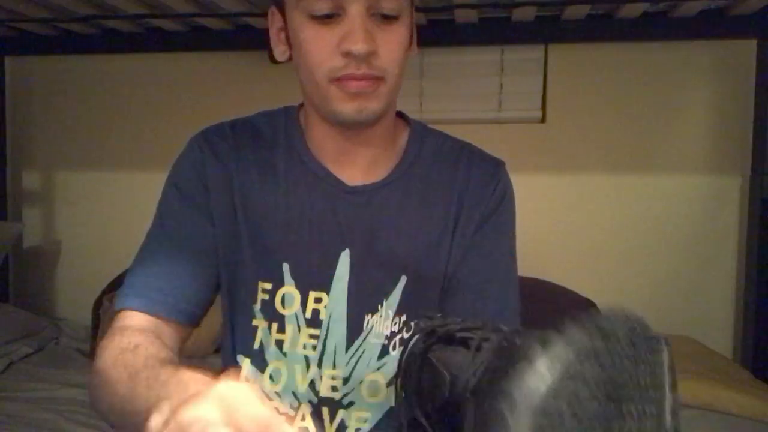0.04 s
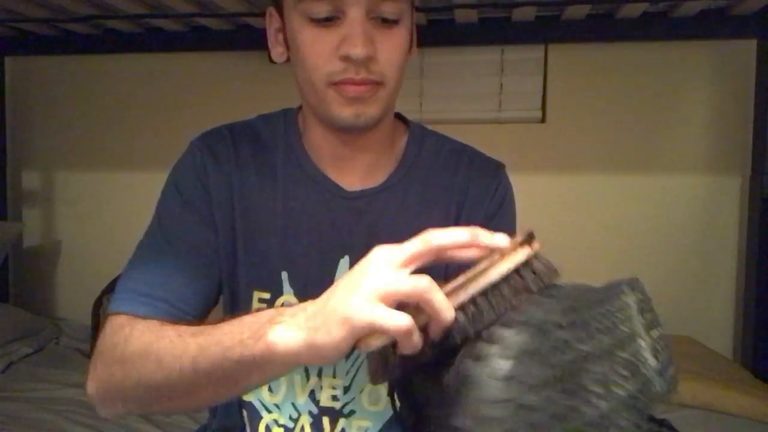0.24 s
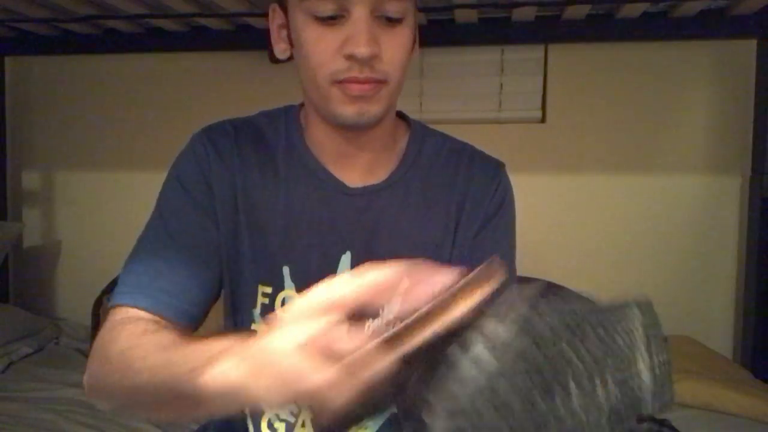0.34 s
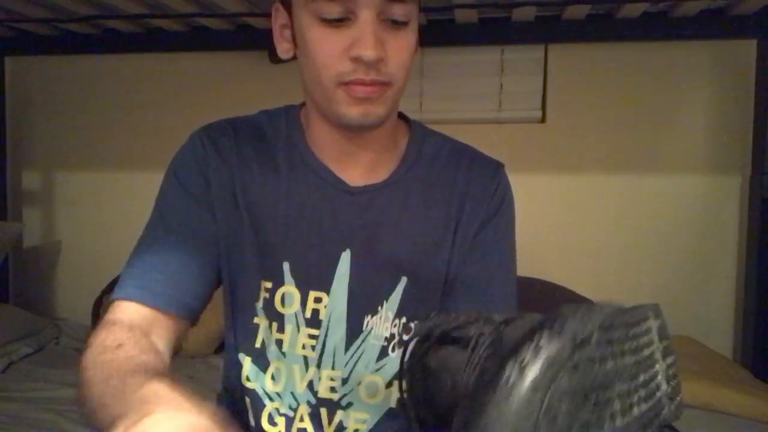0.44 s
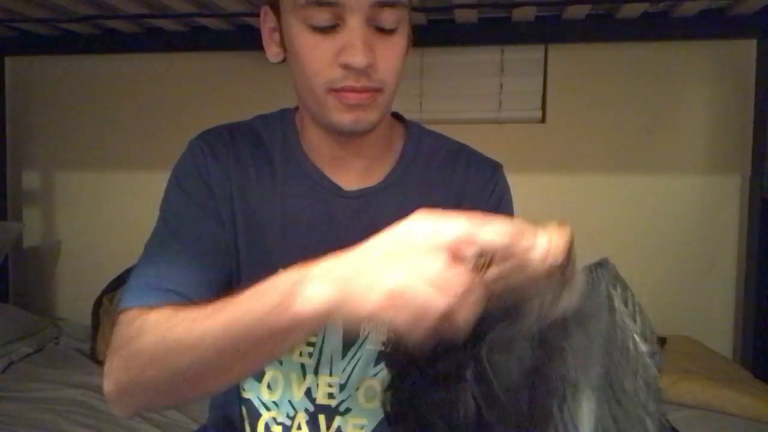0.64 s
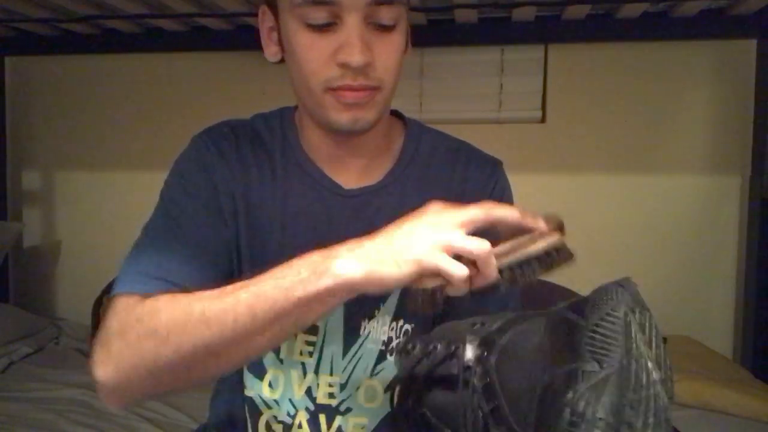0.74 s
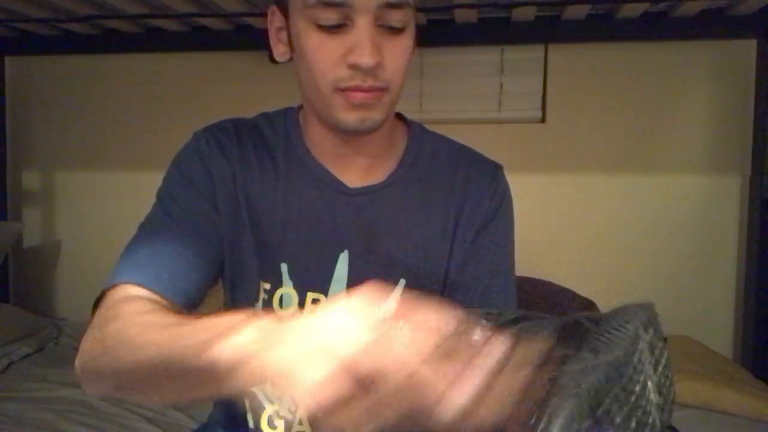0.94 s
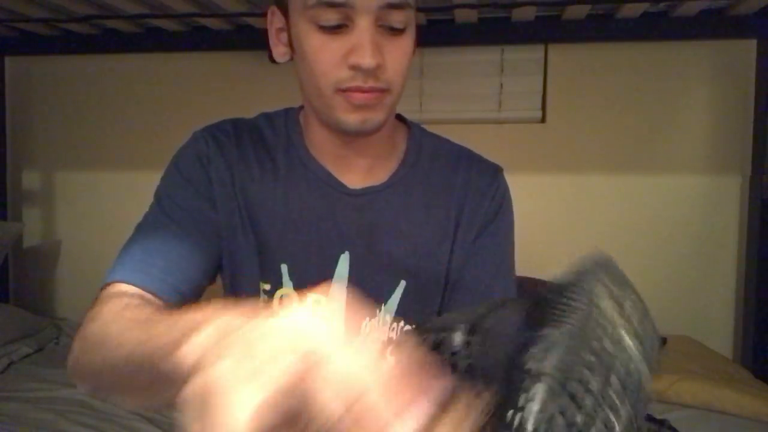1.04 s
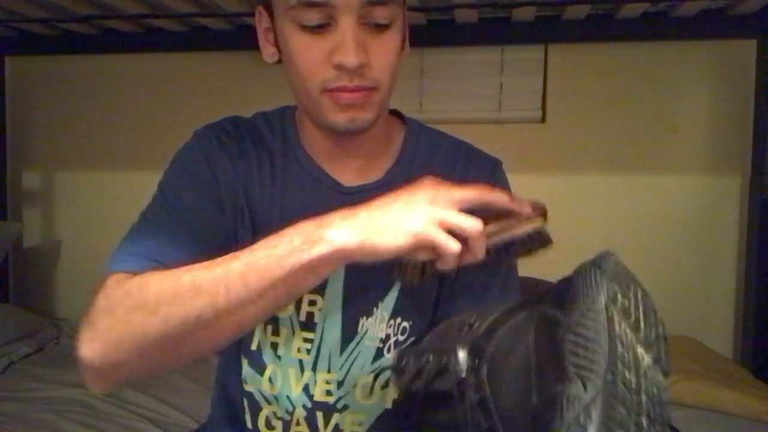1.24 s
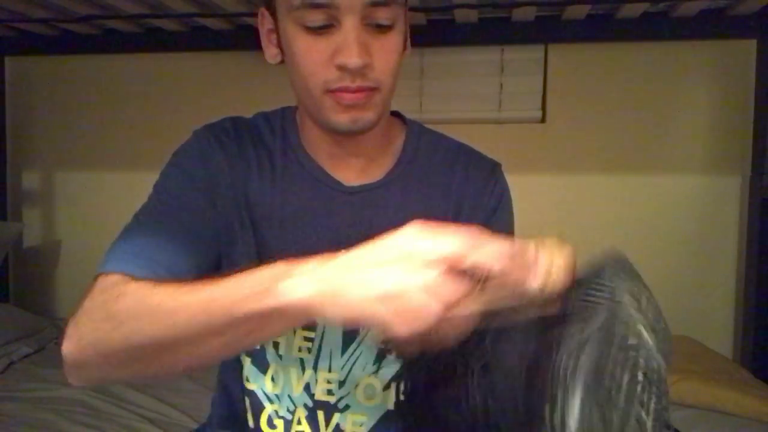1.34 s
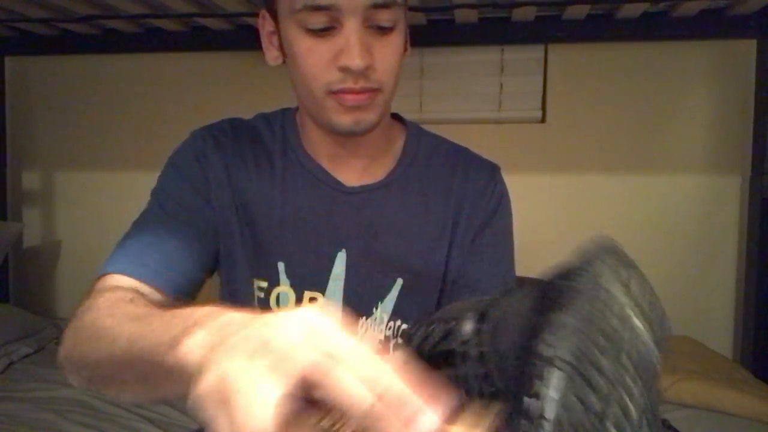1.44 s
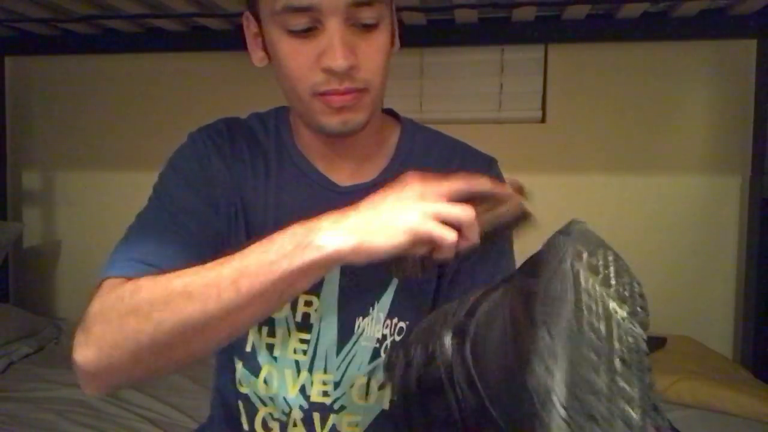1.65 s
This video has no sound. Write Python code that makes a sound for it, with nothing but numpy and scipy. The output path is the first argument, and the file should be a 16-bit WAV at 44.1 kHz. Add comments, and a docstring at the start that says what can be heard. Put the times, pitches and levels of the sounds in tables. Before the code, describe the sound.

Quick, light, hissing strokes of a shoe brush sweep over a leather boot, close by in a quiet room. A louder wooden knock comes early, then a dull thud near the end, over a faint low hum.

```python
"""Bristles scrub to and fro on a leather boot, about four strokes a second, in a small quiet room.
Stick-slip friction of thousands of bristles makes the scrub and the hiss of their tips, and drives the
resonances of the hollow boot. The wooden back of the shoe brush knocks once near the start, and one
later stroke lands with a thud: both are impacts that ring in damped modes. A low hum lies underneath."""
import sys
import numpy as np
from scipy import signal
from scipy.fft import rfft, irfft, next_fast_len
from scipy.io import wavfile
from scipy.ndimage import map_coordinates

SR = 44100
rng = np.random.default_rng(int(sys.argv[2]) if len(sys.argv) > 2 else 0)


def master(y):
    """Save y as 16-bit WAV."""
    cut = np.clip(np.atleast_2d(y).T, -1, 1)
    pcm = np.round(cut * 32767)  # scale
    wavfile.write(sys.argv[1], SR, pcm.astype(np.int16))


N = 74970

# spectrum of bristles rubbing on leather: f/Hz, relative level/dB
FRICTION_SPECTRUM = [(100, -31), (250, -9), (450, -15), (900, -2), (1700, 1.5), (2300, 1.5), (3000, -0.5),
                     (4100, 0), (4900, -6), (6700, -4.5), (10000, -13), (16000, -25.5)]


def amp(db):
    """Amplitude ratio of a level in decibels."""
    return 10 ** (np.asarray(db) / 20)


def unit(x):
    """Normalisation to rms 1."""
    return x / np.sqrt(np.mean(x ** 2) + 1e-20)


def clock():
    """Time t/s of each sample."""
    return np.arange(N) / SR


def along(points, hz):
    """Interpolation of (f/Hz, value) points on a logarithmic frequency axis."""
    f, values = np.transpose(points)
    return np.interp(np.log(hz + 1), np.log(f + 1), values)


def filtered(x, response):
    """Linear filtering: the spectrum of x times a frequency response."""
    size = next_fast_len(N + SR // 2)
    return irfft(rfft(x, size) * response(np.fft.rfftfreq(size, 1 / SR)), size)[:N]


def coloured(x, spectrum):
    """Spectral shaping of x by (f/Hz, level/dB) points, scaled to rms 1."""
    return unit(filtered(x, lambda hz: amp(along(spectrum, hz))))


def wobble(knots_per_s):
    """Smooth random modulation: a spline through Gaussian values."""
    return map_coordinates(rng.standard_normal(N // 10), [clock() * knots_per_s], mode="wrap")


def struck(start, rise_s, t60):
    """Envelope of an impact: a quick rise, then exponential decay by 60 dB in t60 seconds."""
    age = np.maximum(clock() - start, 0)
    return (1 - np.exp(-age / rise_s)) * amp(-60 * age / t60)


def ring(modes, start, rise_s):
    """Free vibration after a blow: a sum of damped sinusoids, one for each mode."""
    return sum(amp(db) * struck(start, rise_s, t60) * np.sin(2 * np.pi * hz * (clock() - start))
               for hz, db, t60 in modes)


def resonance(f, centre, width):
    """Velocity response of a damped oscillator, equal to 1 at its centre frequency."""
    return 1j * f * width / (centre ** 2 - f * f + 1j * f * width)


def room_tone(hum_hz=110.3, hum_db=-65, noise_db=-67):
    """Background noise: a low, slightly wavering pure tone over a dull continuous spectrum."""
    # noise floor: f/Hz, relative level/dB
    floor_spectrum = [(20, -18), (55, 0), (115, 3), (170, -4.5), (280, -4), (450, -11), (1000, -15),
                      (2500, -23.5), (6000, -27.5), (16000, -36.5)]
    hum_rms = amp(hum_db - 0.5 * wobble(knots_per_s=8))
    hum = hum_rms * np.sqrt(2) * np.sin(2 * np.pi * hum_hz * clock())
    return hum + amp(noise_db) * coloured(rng.standard_normal(N), floor_spectrum)


def in_room(x, wet_db, wall_delay_s=0.009):
    """Reverberation: the direct sound plus its convolution with a delayed, decaying diffuse tail."""
    # reverberation time of the room: f/Hz, T60/s
    decay_times = [(150, 0.29), (500, 0.21), (1500, 0.3), (5000, 0.48), (15000, 0.22)]
    hz, t, bands = signal.stft(rng.standard_normal(SR // 2), SR, nperseg=256)
    decay = amp(-60 * t / along(decay_times, hz)[:, None])
    tail = signal.istft(bands * decay, SR, nperseg=256)[1]
    tail = np.pad(tail / np.linalg.norm(tail), (int(wall_delay_s * SR), 0))
    return x + amp(wet_db) * signal.fftconvolve(x, tail)[:N]


def boot_thud(start=1.4028, gain_db=-22.5):
    """Impact excitation: a hard stroke presses through the bristles and sets the boot's modes ringing."""
    # modes of the struck boot: f/Hz, relative level/dB, T60/s
    leather_modes = [(76, -30, .12), (176.4, -21, .06), (306, 2.5, 0.037), (540, -2, 0.022),
                     (762, -4.5, 0.021), (1070, -8, 0.012)]
    low_cut = signal.butter(2, 55, "highpass", fs=SR, output="sos")
    return amp(gain_db) * signal.sosfilt(low_cut, ring(leather_modes, start, rise_s=0.0012))


def wood_knock(start=0.2075, gain_db=-8.5):
    """Cushioned impact: the brush's wooden back bumps the leather and rings, with a faint crack."""
    # modes of the wooden back: f/Hz, relative level/dB, T60/s
    wood_modes = [(232, -26, 0.1), (306, -15.5, 0.075), (454, -10.5, 0.035), (524.4, -2, 0.033),
                  (872, -6.5, 0.019), (952, -21, 0.039), (1296, -23.5, 0.058), (1631, -18, 0.026),
                  (1720, -22.5, 0.036)]
    # contact noise: f/Hz, relative level/dB
    crack_spectrum = [(500, -12), (2400, 5), (4000, 0), (5000, -13), (8000, -20), (16000, -21)]
    noise = coloured(rng.standard_normal(N), crack_spectrum)
    crack = amp(-29.5) * struck(start, rise_s=0.0003, t60=0.011) * noise
    band = signal.butter(4, [131, 1970], "bandpass", fs=SR, output="sos")
    wood = signal.sosfilt(band, ring(wood_modes, start, rise_s=0.0012))
    return amp(gain_db) * (wood + crack)


def flicks(slips_per_s=18000, spread_db=3.5):
    """Stick-slip as shot noise: single bristles catch and let go at random moments with uneven force."""
    slips = rng.random(N) < slips_per_s / SR
    return slips * rng.choice([-1, 1], N) * amp(spread_db * rng.standard_normal(N))


def boot_body(tuning_spread=0.044):
    """Forced vibration: flicks drive the hollow boot's resonances, slightly retuned at each call."""
    # resonances of the boot: f/Hz, bandwidth/Hz, relative level/dB
    boot_modes = [(288, 75, -1), (533.5, 70, -5), (651, 80, -2.5), (805, 110, -7), (1128, 170, -4.5),
                  (1410, 160, -6), (2245, 154, -11)]
    detune = np.exp(tuning_spread * rng.standard_normal(len(boot_modes)))

    def response(f):
        return sum((-1) ** k * amp(db) * resonance(f, hz * detune[k], width)
                   for k, (hz, width, db) in enumerate(boot_modes))
    return unit(filtered(flicks(), response))


def pressing():
    """Resonance under load: the pressed boot gives way and rings, as does the patch under the brush."""
    # hard presses: centre t/s, duration/s, level/dB, patch f/Hz, patch level re boot/dB
    presses = [(.005, 0.035, -53, 530, -4), (.078, 0.044, -53, 1170, -7), (.41, .05, -52, 1247, 0),
               (0.751, 0.036, -54, 1370, -5), (0.933, 0.031, -53, 1040, 0.5), (0.992, 0.033, -44, 690, -4),
               (1.22, 0.029, -56, 1190, 2.5), (1.461, 0.029, -47, 1114, -2.5),
               (1.665, 0.021, -53.5, 1110, -1)]
    # slow motion of the yielding boot: f/Hz, relative level/dB
    sway_spectrum = [(20, -5), (45, 0), (80, -1), (130, -8), (250, -42), (1000, -80)]
    sway = amp(-23) * coloured(rng.standard_normal(N), sway_spectrum)
    out = np.zeros(N)
    for centre, duration, db, patch_hz, patch_db in presses:
        patch = unit(filtered(flicks(), lambda f: resonance(f, patch_hz, width=200)))
        pressure = amp(db) * np.exp(-2 * ((clock() - centre) / duration) ** 2)
        out += pressure * (boot_body() + amp(patch_db) * patch + sway)
    return out


def landings():
    """Contact transients: on brisk strokes the bristles slap down together, ticking at first touch."""
    # bristles meet the leather: t/s, slap level/dB
    touches = [(0.675, -52), (0.9031, -44), (1.389, -41.5)]
    # slap of the bristles: f/Hz, relative level/dB
    slap_spectrum = [(150, -13), (600, 6.5), (1300, 2.5), (1800, 12.5), (2800, -2), (6000, -22),
                     (15000, -31)]
    slap_envelope = sum(amp(db) * struck(start, rise_s=0.0005, t60=0.094) for start, db in touches)
    tick_envelope = sum(amp(db + 2) * struck(start, rise_s=0.00024, t60=0.009) for start, db in touches)
    slap = slap_envelope * coloured(flicks(), slap_spectrum)
    tick = tick_envelope * coloured(flicks(), FRICTION_SPECTRUM)
    return slap + tick


def brushing(attack_s=0.0015, release_s=0.01, judder_db=0.86):
    """Sliding friction: each stroke scrubs the leather, stirs the boot and hisses at the bristle tips."""
    # one curve for each stroke: t/s, scrub level/dB, hiss gain relative to the scrub/dB
    strokes = [
        [(0.0, -55.5, -5), (0.03, -64.5, -7), (0.054, -57, -10), (0.08, -56, -7), (0.096, -65.5, -5),
         (0.11, -68, 8), (0.128, -64, -10), (0.14, -78, 4)],
        [(0.215, -55.5, -19), (0.235, -71, -6), (0.275, -70.5, 3), (0.295, -86, -8)],
        [(0.335, -76, -2), (0.367, -71.5, -12), (0.401, -51, -10.5), (0.479, -54, -2.5), (0.501, -59.5, 2.5),
         (0.525, -78, -5), (0.54, -78, -8.5)],
        [(0.664, -77, -2), (0.676, -52.5, -9), (0.7, -61, -2), (0.724, -54.5, 7.5), (0.758, -45.5, -12),
         (0.774, -48, -9), (0.788, -61, 2.5), (0.82, -73, -14)],
        [(0.902, -55.5, -25), (0.922, -50, -12), (0.945, -51, -9), (0.981, -44, -5.5), (1.029, -55, 5.5),
         (1.085, -75, -7)],
        [(1.145, -78, -17), (1.153, -72, -4), (1.169, -54, -9.5), (1.197, -56.5, 3.5), (1.225, -51.5, -3),
         (1.253, -62.5, 0), (1.29, -81, -4)],
        [(1.389, -48, -19), (1.413, -51, -11), (1.449, -45, -5), (1.465, -49, -6), (1.481, -62.5, 12.5),
         (1.497, -57, 5), (1.54, -77, -6)],
        [(1.575, -91, -5), (1.599, -58.5, -11), (1.607, -52, -11), (1.637, -56, 3.5), (1.669, -53.5, 0.5),
         (1.7, -75, 4)],
    ]
    # hiss of the bristle tips: f/Hz, relative level/dB
    tip_spectrum = [(2000, -18.5), (5500, -8), (8000, -7), (9500, -4), (10400, -8.5), (11500, 0),
                    (13500, 0.5), (16000, -2.5)]
    scrub = coloured(flicks(), FRICTION_SPECTRUM) + amp(-10) * boot_body()
    hiss = amp(2.5) * coloured(flicks(), tip_spectrum)
    t, out = clock(), np.zeros(N)
    for stroke in strokes:
        times, level_db, hiss_db = np.transpose(stroke)
        contact = np.clip(np.minimum((t - times[0]) / attack_s, (times[-1] - t) / release_s + 1), 0, 1)
        envelope = contact * amp(np.interp(t, times, level_db))
        out += envelope * (scrub + amp(np.interp(t, times, hiss_db)) * hiss)
    return out * amp(judder_db * wobble(knots_per_s=180))


def scene():
    """Superposition: brush, impacts and room tone add at one microphone."""
    brush = in_room(brushing() + pressing() + landings(), wet_db=-21.5)
    knock = in_room(wood_knock(), wet_db=-13)
    thud = in_room(boot_thud(), wet_db=-13)
    return (brush + knock + thud + room_tone())[None]


def record(dry):
    """Band limiting: an ideal low-pass filter removes everything above 16 kHz."""
    return filtered(dry[0], lambda hz: hz < 16000)[None]


dry = scene()
out = record(dry)
master(out)
```